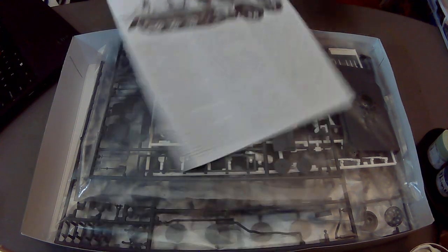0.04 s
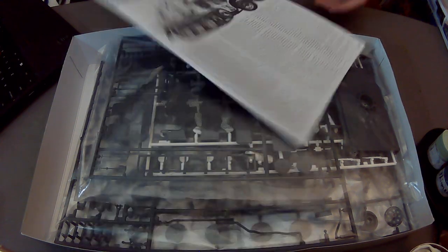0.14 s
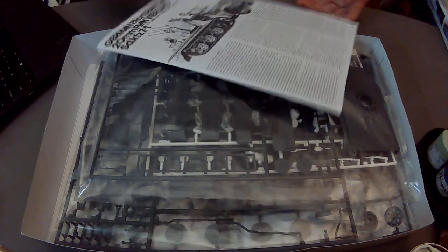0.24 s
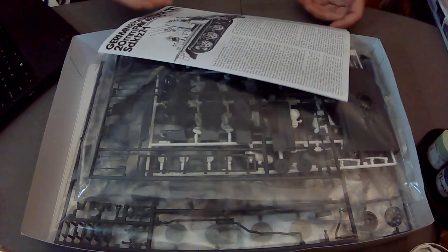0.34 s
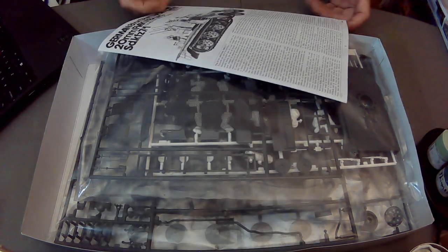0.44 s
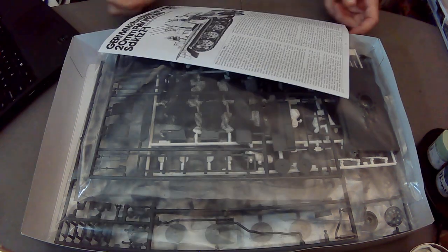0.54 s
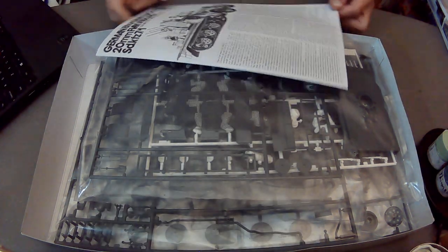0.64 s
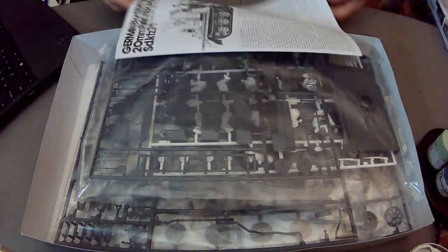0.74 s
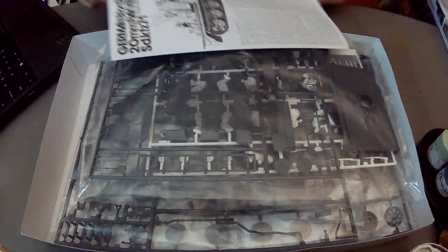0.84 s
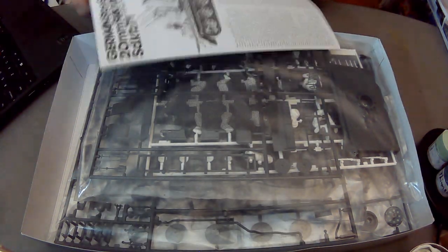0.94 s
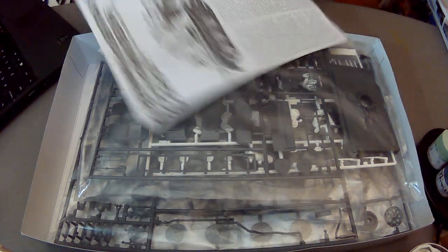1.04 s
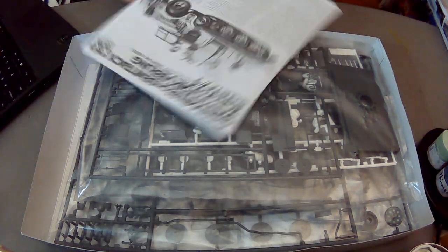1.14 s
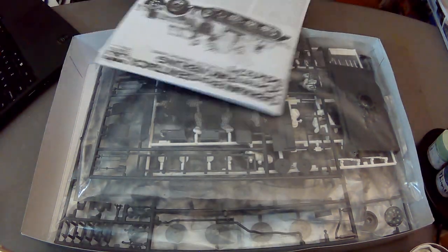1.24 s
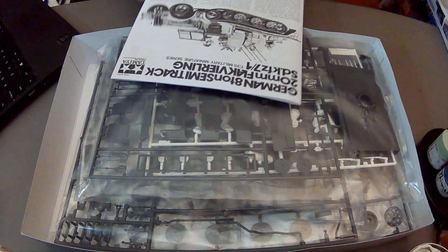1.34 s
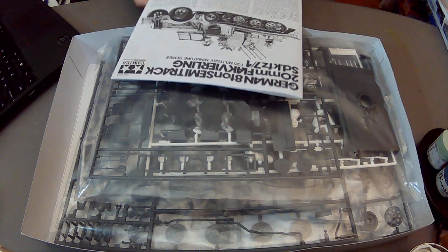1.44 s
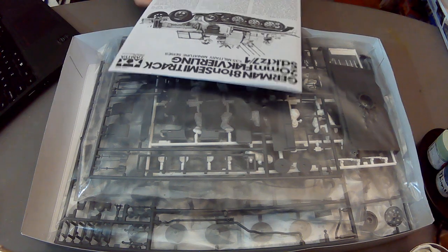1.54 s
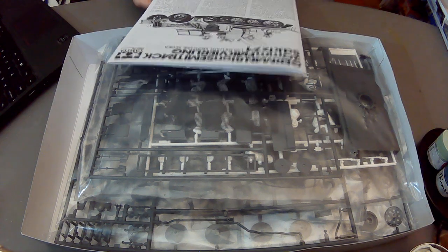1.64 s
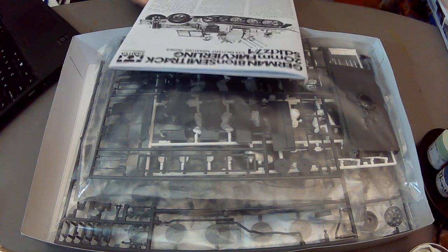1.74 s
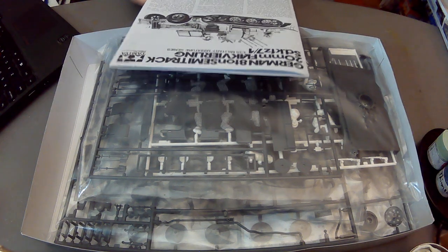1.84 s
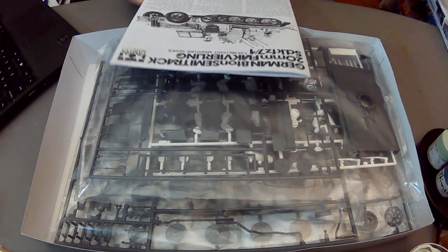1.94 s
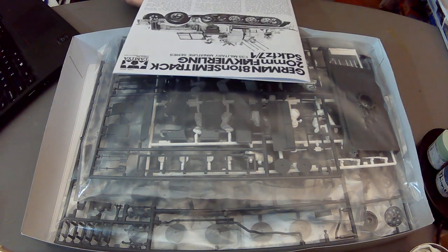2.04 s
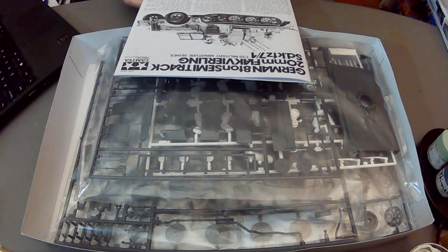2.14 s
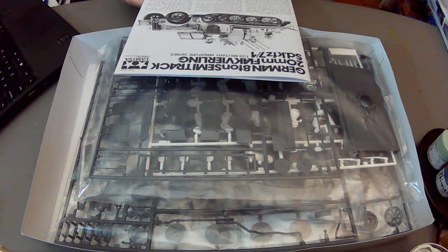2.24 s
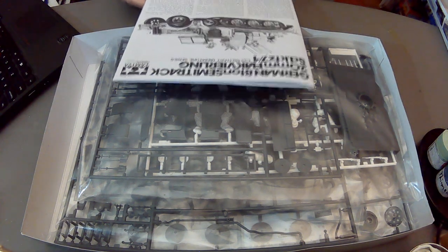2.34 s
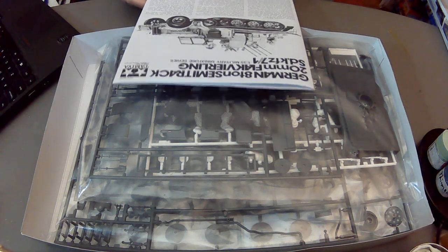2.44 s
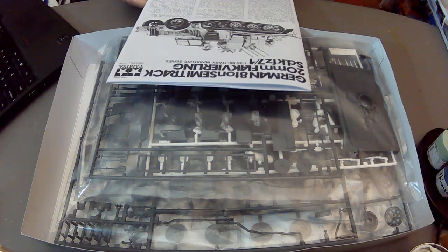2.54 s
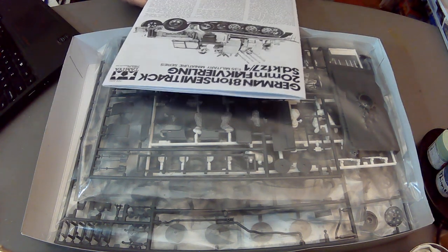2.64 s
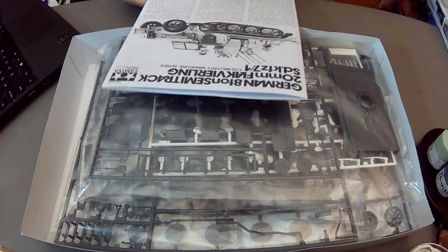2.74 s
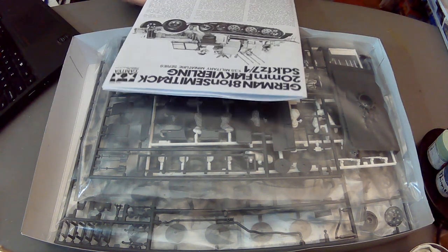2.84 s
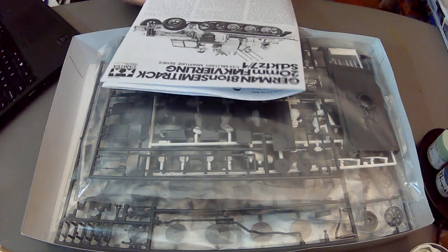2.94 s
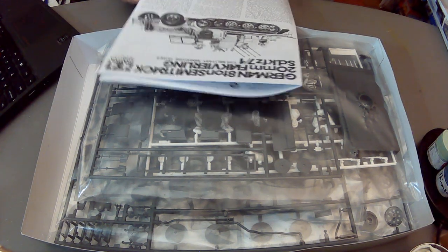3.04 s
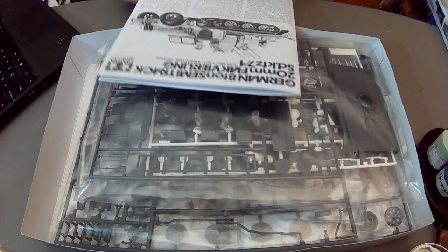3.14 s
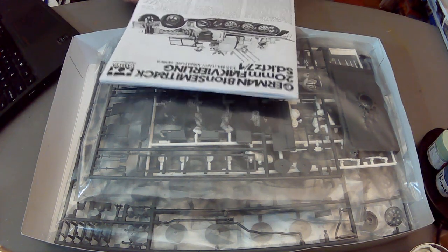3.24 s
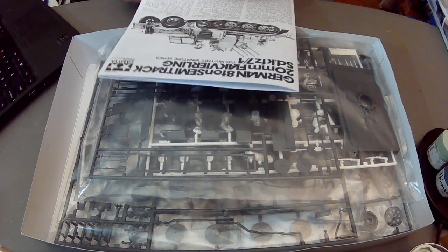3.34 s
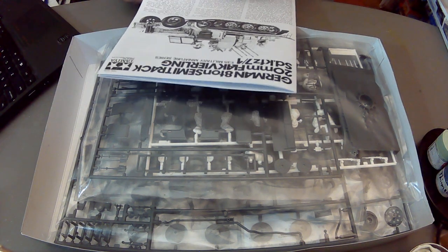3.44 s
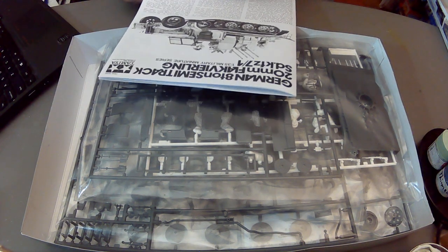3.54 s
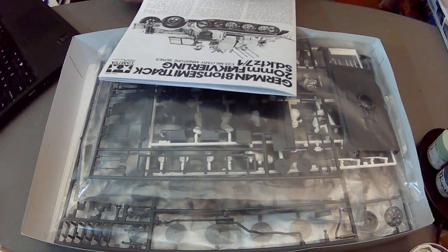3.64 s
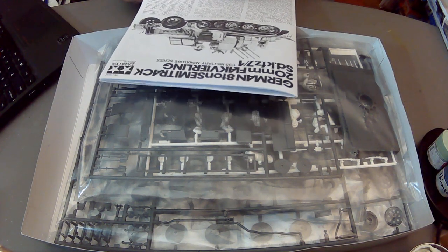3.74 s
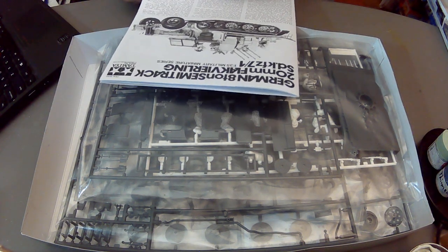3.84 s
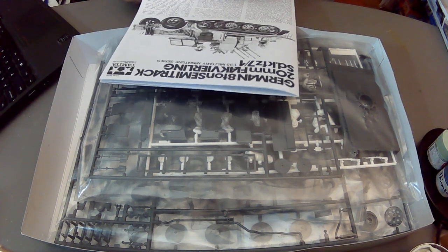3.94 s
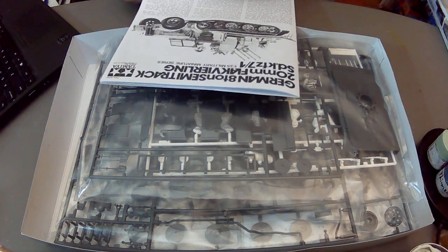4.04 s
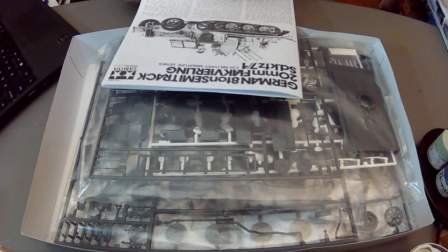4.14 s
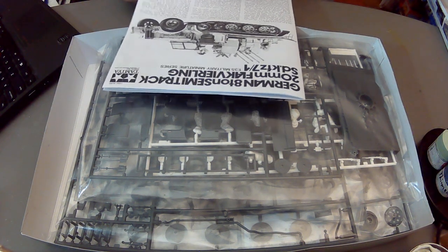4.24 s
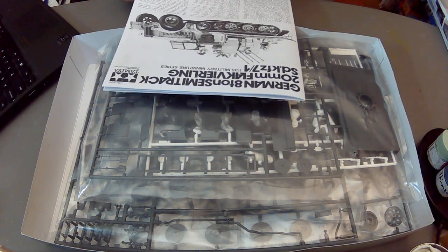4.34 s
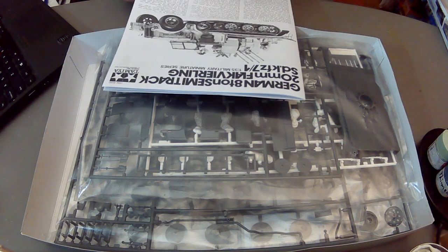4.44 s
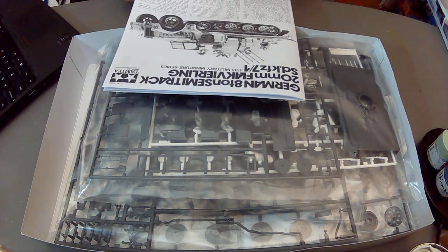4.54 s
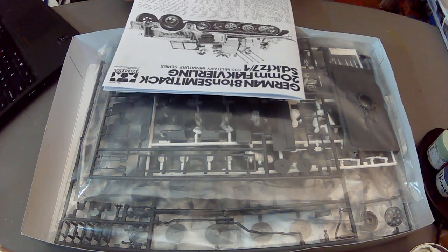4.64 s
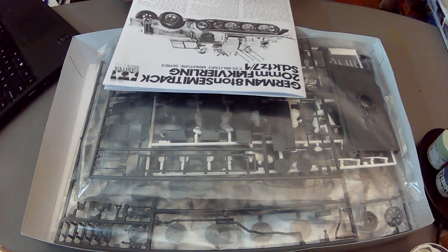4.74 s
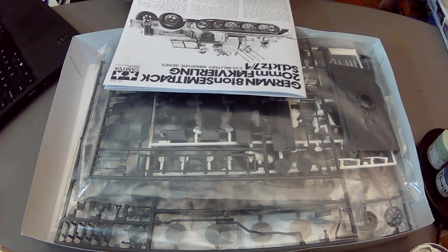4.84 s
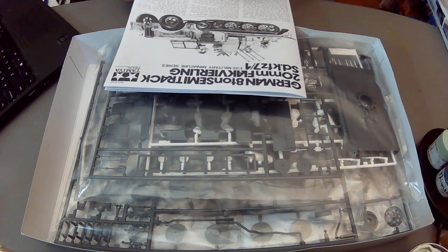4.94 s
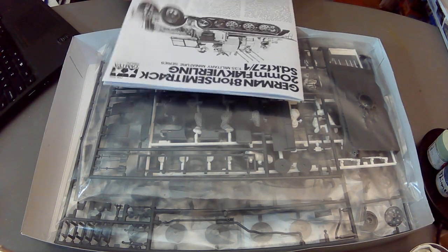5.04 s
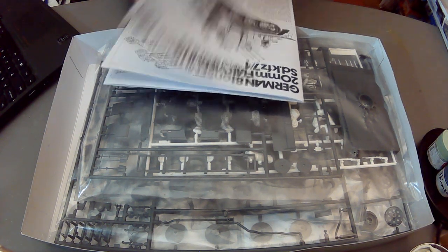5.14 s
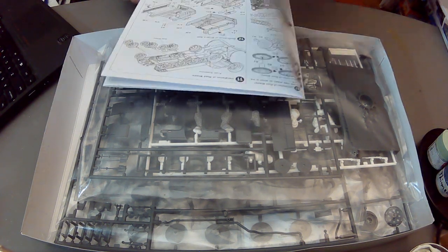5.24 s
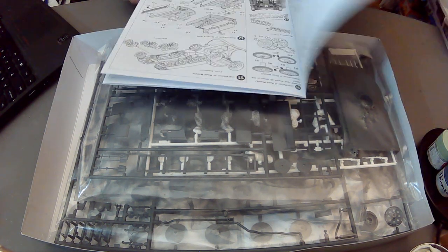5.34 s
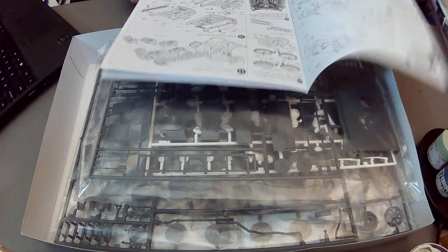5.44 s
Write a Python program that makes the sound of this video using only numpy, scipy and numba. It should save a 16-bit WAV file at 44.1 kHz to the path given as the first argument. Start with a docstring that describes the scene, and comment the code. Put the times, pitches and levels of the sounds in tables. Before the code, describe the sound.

A folded paper booklet is handled close to a small, bass-light microphone in a quiet room with faint steady noise and short near-wall reflections. From 0 to 0.5 s it moves in quick strokes: airy skin-on-paper hiss, coarse rustle and a hollow flap, with soft creases. After a brief dip, the busiest crackling comes at 0.6-1.15 s, with springy pops and page flicks. It thins until a piercing, very short tick at about 1.65 s, the sharpest sound. Little happens until 2.3 s. From there to 3.6 s come lighter, brighter rubs in small clusters, with dry ticks and fluttering page edges, strongest around 2.8-3.5 s. From 3.7 to 4.7 s there is barely any rustle. A small flick sounds at 4.72 s and a tick at 5.03 s, then a hollow snap at 5.22 s, a fuller rustle at 5.3 s and a crisp hissing swish near 5.43 s as a page turns.

```python
"""A fine hiss of skin on paper comes first, over faint room noise: fingers turn, slide and flex a folded
paper booklet over an open cardboard box, under a small camera microphone. Strokes are dense stick-slip noise:
hiss, coarser rustle of the sheet, hollow ring of the air in the fold. Filtered bursts make snapping creases and
flicked pages, single resonances make springing panels, smooth pressure pulses make air puffs at the microphone."""
import sys
import numpy as np
from scipy import signal
from scipy.fft import rfft, irfft
from scipy.io import wavfile
from scipy.ndimage import uniform_filter1d
from numba import njit

SR = 44100
rng = np.random.default_rng(int(sys.argv[2]) if len(sys.argv) > 2 else 0)


def gain_from_db(level_db):
    """Convert decibel levels to linear amplitude factors (20 dB per decade)."""
    decades = np.asarray(level_db, float) / 20
    return 10 ** decades


def bounce(signal):
    """Save signal as a 16-bit WAV file at the path given by the first command-line argument."""
    frames = np.transpose(np.atleast_2d(signal))
    limited = np.clip(frames, -1, 1)
    pcm = np.round(limited * 32767).astype(np.int16)
    wavfile.write(sys.argv[1], SR, pcm)


N = 242770
LN_60_DB = np.log(1000)


def shape(x, points):
    """Causal minimum-phase filter through (frequency [Hz], gain [dB]) points, from the cepstrum of the log gain."""
    hz, db = np.transpose(points)
    grid_hz = np.maximum(np.arange(2049) * SR / 4096, 1)
    log_gain = np.interp(np.log(grid_hz), np.log(hz), db) * np.log(10) / 20
    cepstrum = irfft(log_gain)
    cepstrum[1:2048] *= 2
    cepstrum[2049:] = 0
    impulse = irfft(np.exp(rfft(cepstrum)))
    return signal.fftconvolve(x, impulse)[:len(x)]


def ring(x, hz, width_hz):
    """One fixed resonance, gain 1 at the centre."""
    b, a = signal.iirpeak(min(hz, .45 * SR), max(hz / width_hz, .5), SR)
    return signal.lfilter(b, a, x)


@njit
def sweep(x, hz, width_share):
    """State-variable band-pass whose centre moves every sample; width_share is width over centre."""
    y, band, low = np.empty(len(x)), 0., 0.
    for i in range(len(x)):
        g = np.tan(np.pi * hz[i] / SR)
        v = (band + g * (x[i] - low)) / (1 + g * (g + width_share))
        band, low, y[i] = 2 * v - band, low + 2 * g * v, width_share * v
    return y


@njit
def grains(start, hz, size, t60_s):
    """Short decaying sines, one per grain."""
    out = np.zeros(N)
    for k in range(len(start)):
        turn = np.exp(2j * np.pi * hz[k] / SR - LN_60_DB / (t60_s * SR))
        z = size[k] + 0j
        for i in range(start[k], min(N, start[k] + int(t60_s * SR))):
            out[i] += z.imag
            z *= turn
    return out


def walk(rate_hz):
    """Random levels, each held 1 / rate_hz and slewed into the next; spread a little under 1."""
    hold = int(SR / rate_hz)
    levels = rng.standard_normal(N // hold + 1)
    return uniform_filter1d(np.repeat(levels, hold), hold)[:N]


def along(s, v):
    """Straight lines through values v at times s."""
    return np.interp(np.arange(N) / SR, s, v)


def swell(s, rise_ms, fall_ms, db):
    """Level in dB of events that rise and fall on straight dB slopes (ms per 20 dB) and add in power."""
    ms = np.arange(0, 1000 * N / SR + 1)
    late_ms = ms - 1000 * s[:, None]
    rising = -late_ms / np.maximum(rise_ms, 2)[:, None]
    falling = late_ms / np.maximum(fall_ms, 2)[:, None]
    drop_db = 20 * np.maximum(rising, falling)
    power = np.sum(gain_from_db(db[:, None] - drop_db) ** 2, axis=0) + 1e-14
    return np.interp(np.arange(N) * 1000 / SR, ms, 10 * np.log10(power))


# microphone response: (frequency [Hz], gain [dB])
MICROPHONE_RESPONSE = [(30, -53), (150, -57.5), (220, -30.5), (320, -3.5), (500, -2.5), (8000, 7),
                       (9600, 11.5), (11000, 18.5), (12500, 6), (14000, -3), (15700, -9.5), (16100, -29),
                       (20000, -46)]


def microphone(x):
    """The microphone drops the bass and peaks in the treble."""
    return shape(x, MICROPHONE_RESPONSE)


def heard_at_unit(x):
    """Scale so that the microphone delivers rms 1."""
    return x / np.std(microphone(x))


def heard_peak_unit(x):
    """Scale so that the microphone delivers peak 1."""
    return x / np.abs(microphone(x)).max()


def friction(scatter_db, catch_db, catch_rate_hz):
    """Dense slips of uneven size; the contact catches and lets go many times a second."""
    size_db = scatter_db * rng.exponential(size=N) + catch_db * walk(catch_rate_hz)
    return gain_from_db(size_db) * rng.standard_normal(N)


def patchy(x):
    """The bending sheet radiates unevenly: random patches in time and pitch swell or fade."""
    depth_db, patch_s, patch_hz = 3, .025, 600
    spec = signal.stft(x, nperseg=256)[2]
    field = rng.standard_normal(spec.shape)
    for _ in range(2):
        field = uniform_filter1d(field, max(int(patch_hz * 256 / SR), 1), axis=0)
        field = uniform_filter1d(field, max(int(patch_s * SR / 128), 1), axis=1)
    gain = gain_from_db(depth_db * field / np.std(field))
    return signal.istft(spec * gain, nperseg=256)[1][:N]


def resonate(modes, centre_hz, reach, wander, flap):
    """Rubbing rings resonances; those nearest the pitch of the flapping gap sound most, and each wavers."""
    rub = friction(scatter_db=2.0, catch_db=2.0, catch_rate_hz=70)
    gap_hz = centre_hz * np.exp(flap * walk(40))
    out, power = 0, 0
    for hz, width_hz, db in modes:
        near = gain_from_db(db) * (0.4 + np.exp(-(np.log(gap_hz / hz) / reach) ** 2))
        moving_hz = hz * np.exp(wander * walk(12))
        drifting = sweep(ring(rub, hz, 4 * width_hz), moving_hz, width_hz / hz)
        out = out + near * gain_from_db(2.37 * walk(35)) * heard_at_unit(drifting)
        power = power + near ** 2
    return out / np.sqrt(power)


# room and microphone noise spectrum: (frequency [Hz], gain [dB])
ROOM_SPECTRUM = [(18, -69), (30, -32), (95, -32.5), (189, -24.5), (273, -6), (364, 2), (473, 0),
                 (1040, -1.5), (1160, -5.5), (2480, -12.5), (3870, -17.5), (4650, -22.5), (5310, -20.5),
                 (9710, -18), (15700, -24.5), (16100, -49.5)]


def room():
    """Quiet air and the microphone's own noise, swelling a little."""
    level_db = -72 + 1.6 * walk(2.42)
    air = shape(rng.standard_normal(N), ROOM_SPECTRUM)
    return gain_from_db(level_db) * air / np.std(air)


# finger strokes: (loudest moment [s], rise [ms per 20 dB], fall [ms per 20 dB],
# skin hiss [dB], sheet rustle [dB], hollow ring [dB]); slopes are those of the hiss
STROKES = [(.010, 41, 31, -49.5, -74, -77), (0.041, 35, 93, -50.5, -74.5, -61.5),
           (.107, 8, 99, -50, -63, -84), (0.139, 0, 144, -36, -41, -44), (.18, 48, 107, -46.5, -62, -47.5),
           (.228, 62, 53, -44.5, -58, -52), (0.278, 0, 110, -41.5, -48, -45),
           (0.348, 118, 205, -71, -48.5, -53.5), (0.438, 106, 47, -78, -52, -48.5),
           (0.613, -1, 58, -44, -52.5, -104), (0.634, 27, 108, -51.5, -53, -57.5),
           (0.702, 44, 58, -46.5, -50, -52), (0.719, 5, 202, -36.5, -44, -46.5),
           (.765, 56, 102, -59, -44.5, -65), (0.797, 40, 104, -38, -41.5, -52),
           (.824, 70, 91, -42, -41.5, -45.5), (0.864, 62, 62, -60, -46.5, -49.5),
           (.9, 60, 99, -66, -61, -60), (0.942, 76, 93, -52, -57, -53), (0.991, 80, 29, -70, -64, -56),
           (1.035, 21, 182, -45, -56.5, -46.5), (1.084, 99, 57, -45.5, -51, -47.5),
           (1.124, 60, 50, -43.5, -55.5, -66), (1.15, 94, 200, -48, -79, -84),
           (1.24, 119, 116, -47, -67, -85), (1.29, 67, 52, -60, -60.5, -64),
           (1.37, 103, 152, -74, -70, -65.5), (1.531, 4, 100, -79, -65, -59.5),
           (1.554, 58.5, 250, -63, -55.5, -58), (1.605, 60, 60, -59, -61, -60),
           (1.636, 50, 38, -68, -57, -56), (1.652, 5, 54, -37, -68, -61.5), (1.715, 150, 42, -49, -77, -70),
           (1.789, 42, 144, -59.5, -70, -60), (1.906, 30, 80, -61, -96, -63),
           (1.974, 19, 46, -52.5, -76, -63), (2.328, 15, 75, -59, -51, -62.5),
           (2.345, 30, 60, -46, -49, -66), (2.362, 38, 60, -43, -48, -62.5), (2.382, 50, 50, -48, -50, -64),
           (2.428, 109, 39, -78, -63.5, -55), (2.487, 7, 60, -43.5, -51.5, -75),
           (2.507, 26, 64, -52, -51, -75), (2.538, 87, 53, -65, -51, -61),
           (2.663, 75, 105, -53.5, -53, -80), (2.77, 60, 63, -80, -62, -65),
           (2.796, 10, 101, -45, -52, -75), (2.834, 47, 44, -45.5, -50.5, -73),
           (2.867, 24, 57, -49.5, -52, -76), (2.911, 10, 103, -45, -51, -60),
           (2.961, 87, 99, -41.5, -47, -79), (3.006, 56, 47, -59, -52, -72),
           (3.07, 43, 127, -42.5, -51, -57.5), (3.105, 116, 89, -47, -47, -72),
           (3.191, 88, 78, -50, -51, -65), (3.348, 54, 42, -45.5, -53.5, -63),
           (3.425, 29, 60, -46, -53, -72), (3.461, 10, 65, -52, -59, -60), (3.592, 10, 69, -56, -58, -57.5),
           (3.627, 40, 41, -68, -59, -66), (3.73, 62, 60, -90, -78, -68), (3.789, 66, 88, -76, -65, -63.5),
           (3.841, 97, 61, -81, -70, -68.5), (4.046, 33, 77, -67.5, -65.5, -69),
           (4.09, 62, 80, -87, -66.5, -64), (4.178, 149, 249, -77, -60, -60.5),
           (4.328, 106, 107, -72, -70, -87), (4.439, 210, 78, -83, -68.5, -70),
           (4.723, 22, 44, -58, -55.5, -63), (4.736, 57, 70, -80, -60.5, -57),
           (4.819, 14, 47, -59.5, -65.5, -73), (4.882, 71, 60, -76, -70, -71),
           (5.032, 11, 123, -53, -60, -60), (5.074, 61, 86, -59.5, -53, -75), (5.1, 42, 40, -73, -61, -69),
           (5.19, 62, 58, -68, -60.5, -79), (5.21, 6, 26, -79, -53.5, -69), (5.225, 13, 72, -88, -75, -54),
           (5.27, 57, 65, -79, -63, -51), (5.301, 27, 45, -47, -40, -51), (5.35, 48, 102, -59, -62, -66),
           (5.392, 36, 63, -73, -54.5, -58), (5.412, 34, 58, -46, -53, -61),
           (5.429, 36, 66, -41.5, -50, -60), (5.48, 58, 152, -56.5, -62.5, -77)]


def strokes():
    """Levels in dB of hiss, rustle and hollow ring; the latter two rise and fall faster than the hiss."""
    s, rise_ms, fall_ms, skin_db, sheet_db, air_db = np.transpose(STROKES)
    hiss_db = swell(s, rise_ms, fall_ms, skin_db)
    rustle_db = swell(s, 0.72 * rise_ms, 0.72 * fall_ms, sheet_db)
    hollow_db = swell(s, 0.68 * rise_ms, 0.68 * fall_ms, air_db)
    return hiss_db, rustle_db, hollow_db


# booklet held between strokes: (time [s], faint rustle [dB], rustle centre [Hz], ring centre [Hz])
GRIP = [(0, -80, 2250, 827), (0.133, -70, 3360, 865), (.25, -59, 2430, 870), (.33, -66, 2995, 850),
        (.38, -72, 2560, 850), (.45, -80, 2050, 816), (.59, -101, 2340, 874), (0.726, -90, 3390, 850),
        (.76, -90, 2430, 850), (.83, -87, 3074, 820), (0.899, -83, 2620, 850), (1.08, -82, 2195, 856),
        (1.27, -83, 3120, 750), (1.47, -83, 2340, 770), (1.711, -66.5, 3280, 940),
        (1.799, -70.5, 2050, 750), (2.27, -71, 2096, 860), (2.6, -65.5, 2410, 940),
        (2.85, -64.5, 2647, 930), (2.96, -61, 3590, 936), (3.09, -65, 2594, 910), (3.302, -64.5, 2570, 840),
        (3.55, -71, 2460, 860), (3.72, -77, 2400, 850), (3.82, -77, 2630, 986), (3.95, -83, 2060, 857),
        (4.17, -81, 1905, 940), (4.36, -80, 2660, 815), (4.6, -80, 2155, 808), (5.079, -76.5, 2920, 874),
        (5.22, -63, 1670, 980), (5.303, -55, 2547, 1140), (5.5, -79.5, 3260, 880)]


def grip():
    """The held booklet rustles faintly, and its shape sets the pitch of rustle and ring."""
    s, held_db, rustle_hz, hollow_hz = np.transpose(GRIP)
    return gain_from_db(along(s, held_db)), along(s, rustle_hz), along(s, hollow_hz)


# duller hiss grows with the rustle: (rustle re hiss [dB], duller hiss re hiss [dB])
DULL_SHARE = [(-35.5, -14), (-13.5, -10.5), (-5.5, -6.5), (4.5, -2.5)]
# hiss spectrum: (frequency [Hz], gain [dB])
HISS_SPECTRUM = [(6000, -37.5), (8500, -6), (10000, -3.5), (12000, -2.5), (16000, -4)]
# duller hiss spectrum: (frequency [Hz], gain [dB])
DULL_SPECTRUM = [(3200, -16), (5000, -13), (6500, -7), (8500, -5.5), (11000, -19.5)]


def hiss(rustle_re_hiss_db):
    """Skin slides on paper fibres; a flatter touch adds a duller part."""
    dull_db = np.interp(rustle_re_hiss_db, *np.transpose(DULL_SHARE))
    rub = friction(scatter_db=2.0, catch_db=3.0, catch_rate_hz=90)
    fine = heard_at_unit(shape(rub, HISS_SPECTRUM))
    dull = heard_at_unit(patchy(shape(rub, DULL_SPECTRUM)))
    return fine + gain_from_db(dull_db) * dull


# rustle spectrum: (frequency [Hz], gain [dB])
RUSTLE_SPECTRUM = [(700, -7.5), (1500, -6), (2000, -8), (2600, -6), (3500, -8.5), (4300, -12), (5500, -21),
                   (9000, -16.5)]
# page resonances, also rung by flicks(): (frequency [Hz], width [Hz], level [dB])
PAGE_MODES = [(778, 100, 2), (1024, 46, -2), (1612, 110, -2.5), (2394, 120, -0.5), (2747, 130, -1.5),
              (3200, 390, -8), (4170, 600, -6), (5640, 1200, -12)]


def rustle(centre_hz):
    """The sheet rubs and rings its resonances; small panels between its bends pop, each at its own pitch."""
    centre_hz = np.clip(centre_hz, 800, 7000)
    rub = friction(scatter_db=2.0, catch_db=2.0, catch_rate_hz=80)
    start = np.sort(rng.integers(0, N, 4000))
    pitch, size = rng.standard_normal((len(start), 2)).T
    sizes = gain_from_db(4 * size - 5 * np.maximum(pitch, 0))  # higher pops are weaker
    pops = grains(start, centre_hz[start] * np.exp(0.33 * pitch), sizes, 0.035)
    broad = patchy(shape(rub, RUSTLE_SPECTRUM))
    page = resonate(PAGE_MODES[2:], centre_hz, .45, wander=.03, flap=0.22)
    mix = heard_at_unit(broad)
    mix = mix + gain_from_db(-6) * heard_at_unit(sweep(broad, centre_hz, 1.0))
    mix = mix + gain_from_db(-3.0) * heard_at_unit(pops)
    return heard_at_unit(mix + gain_from_db(-4.0) * page)


# air between the pages, then the deeper fold: (frequency [Hz], width [Hz], level [dB])
HOLLOW_MODES = [(647.7, 19, -1.5), (747.3, 59.5, 3.5), (820, 47, 2), (892, 91, 2), (1027, 220, -6.5),
                (1315, 28, 3.5), (940, 330, -5)]


def hollow(centre_hz):
    """Rubbing rings the air trapped between the pages."""
    return resonate(HOLLOW_MODES, centre_hz, 0.16, wander=.03, flap=0.14)


# fold resonances: (frequency [Hz], width [Hz], level [dB])
FOLD_MODES = [(338, 280, 1), (397.4, 26.5, 1), (457.7, 32, -2.5), (515, 35, -5)]
# hard bends of the fold: (loudest moment [s], rise [ms per 20 dB], fall [ms per 20 dB], level [dB], centre [Hz])
FLEXES = [(.051, 34, 77, -62, 500), (.158, 34, 131, -55, 448), (.248, 26, 42, -50, 397),
          (0.262, 20, 37, -43, 370), (.288, 50, 6, -45, 406), (.44, 150, 40, -69, 476),
          (0.729, 24, 150, -59, 398), (.84, 64, 77, -62, 400), (.89, 82, 33, -57.5, 405),
          (1.055, 36, 122, -61.5, 433), (1.11, 78, 38, -70, 440), (1.292, 17, 40, -64.5, 426),
          (2.058, 15, 14, -60, 445), (5.211, 5, 37, -54.5, 475), (5.29, 71, 27, -52, 515)]


def fold(ring_gain):
    """The fold rings 15.5 dB under the hollow ring, and louder where it is bent hard."""
    *flex, fold_hz = np.transpose(FLEXES)
    gain = np.hypot(gain_from_db(-15.5) * ring_gain, gain_from_db(swell(*flex)))
    return gain * resonate(FOLD_MODES, along(flex[0], fold_hz), 0.12, wander=0.0069, flap=.02)


# snapping creases: (time [s], peak [dB], centre [Hz], burst t60 [s], 3 ms at least)
SNAPS = [(.0225, -46, 1080, 0.01), (.03, -43.5, 750, 0.016), (.043, -47, 940, 0.033),
         (.108, -56, 2200, .008), (.13, -55, 900, .008), (0.104, -40, 10300, 0.02),
         (0.138, -34, 3400, 0.01), (0.1415, -40, 3200, .016), (.278, -44.5, 360, 0.039),
         (.256, -46, 290, .04), (.258, -48, 4500, 0.0087), (0.278, -33, 10500, .02),
         (.573, -58, 9000, .004), (.59, -56, 9000, 0.0037), (0.612, -45, 11700, .025),
         (.717, -32, 11200, 0.028), (0.725, -40, 1200, 0.0092), (.737, -32, 2100, .012),
         (0.737, -36, 4300, 0.017), (0.755, -32, 2400, 0.035), (0.806, -33, 2190, .015),
         (0.95, -36.5, 10400, 0.015), (1.033, -47, 820, 0.012), (1.034, -37, 10800, .025),
         (1.283, -36, 10900, 0.041), (1.526, -51, 765, 0.036), (1.632, -30.5, 10900, 0.011),
         (1.65, -18, 11200, 0.0052), (1.6537, -16.5, 11100, 0.0027), (1.655, -22, 10900, 0.0063),
         (1.638, -47, 2780, .01), (1.712, -51, 4150, 0.008), (1.974, -50, 10000, 0.036),
         (2.034, -52, 11200, 0.018), (2.052, -51.5, 580, 0.011), (2.052, -54, 1640, 0.0074),
         (2.333, -40.5, 11400, 0.028), (2.409, -48, 820, .05), (2.485, -43, 11100, .025),
         (2.795, -37.5, 11200, 0.029), (2.827, -31, 10800, 0.038), (2.828, -45, 2530, 0.021),
         (2.868, -32.5, 10600, 0.037), (2.908, -39, 11500, .025), (2.97, -38.5, 2900, 0.074),
         (3.074, -54, 2300, .015), (3.19, -60, 960, 0.025), (3.341, -35.5, 11400, 0.042),
         (3.4, -47, 11000, .01), (3.415, -31.5, 10500, 0.07), (3.421, -44, 3200, 0.0063),
         (3.459, -39, 10800, 0.026), (3.459, -45, 2640, 0.038), (3.539, -49.5, 10400, 0.054),
         (3.59, -52.5, 2330, 0.014), (4.723, -62, 797, 0.024), (4.82, -43.5, 10900, 0.03),
         (5.032, -40.5, 10700, 0.042), (5.068, -45, 3000, .01), (5.204, -51, 4000, .006),
         (5.21, -43, 1590, .012), (5.212, -44, 2400, .01), (5.221, -31, 1400, 0.009),
         (5.221, -38.5, 2670, 0.0069), (5.259, -50, 5900, .005), (5.302, -45, 3040, .015),
         (5.426, -36, 4570, .006)]


def snaps():
    """A crease buckles: a tick and a short burst, ringing around its own centre."""
    out, t = np.zeros(N + 4096), np.arange(4096) / SR
    noises = rng.standard_normal((len(SNAPS), len(t)))
    for (s, db, hz, t60_s), noise in zip(SNAPS, noises):
        # width over centre: snaps under 6 kHz, ticks above, hardest ticks
        share = 0.55 if hz < 6000 else 1 if db < -28 else 0.47
        burst = noise * np.exp(-LN_60_DB * t / max(t60_s, .003)) + 4 * (t == 0)
        for widen in (1, 1, 1.3):
            burst = ring(burst, hz, widen * share * hz)
        start = int(s * SR)
        out[start:start + len(t)] += gain_from_db(db) * heard_peak_unit(burst)
    return out[:N]


# air puffs: (zero crossing [s], slope level [dB], length [s])
PUFFS = [(.14, -86, .004), (.165, -84, 0.0057), (.275, -89, 0.0073), (0.724, -80, 0.0053),
         (1.644, -81, 0.00417), (5.222, -68, 0.0025)]


def puffs():
    """Each puff of air on the microphone is one soft push and pull of pressure."""
    t = np.arange(N) / SR
    out = np.zeros(N)
    for s, db, length_s in PUFFS:
        out += gain_from_db(db) * (s - t) / length_s * np.exp(-((t - s) / length_s) ** 2)
    return out


# panels springing free: (time [s], peak [dB], pitch [Hz], t60 [s], 10 ms at least)
PINGS = [(.254, -43, 382, 0.097), (.275, -46, 394, .07), (.316, -36.5, 755, 0.086), (.141, -42, 3100, .04),
         (.143, -44, 4300, .03), (.145, -43, 900, .07), (.73, -43, 4400, .03), (.74, -39, 2350, .06),
         (.752, -38, 2750, .06), (.762, -43, 4300, .05), (.766, -42, 2450, .04), (.803, -39, 2200, .03),
         (.835, -43, 2800, .05), (.86, -44, 2900, .04), (.804, -41, 846, .05), (.824, -39, 874, 0.045),
         (1.026, -46, 910, .08), (1.034, -48, 2600, 0.037), (1.036, -48, 1314, .06), (1.052, -44, 743, .06),
         (1.08, -46, 935, 0.088), (1.08, -52, 2500, .06), (1.1, -52.5, 1322, 0.22),
         (1.104, -53, 2090, 0.083), (1.104, -53, 2550, .07), (1.107, -48, 770, .06), (1.6, -50, 840, .06),
         (1.712, -45.5, 3650, 0.018), (1.719, -57, 3980, .04), (2.404, -52, 950, .05),
         (2.414, -50, 760, .09), (2.826, -45.5, 2440, .04), (2.944, -44, 3370, .03),
         (2.967, -51, 3280, .03), (3.003, -49, 2780, .04), (3.06, -48, 2770, .04), (3.192, -47, 960, 0.046),
         (3.418, -50, 4300, .04), (3.459, -54, 2760, .07), (3.466, -53, 952, 0.089),
         (3.591, -55, 1600, 0.069), (3.593, -51, 2610, 0.049), (3.622, -52, 1580, 0.052),
         (3.785, -61, 2640, 0.053), (4.162, -60, 1770, 0.07), (4.724, -48, 1580, .05),
         (4.724, -54, 2410, .06), (4.735, -47, 753, 0.057), (5.031, -58, 3200, .04),
         (5.031, -59, 4250, .05), (5.031, -60, 5500, .05), (5.211, -50, 497, 0.088),
         (5.223, -38, 972, 0.055), (5.232, -44, 800, .08), (5.25, -51, 500, .06), (5.27, -50, 1450, .05),
         (5.288, -48, 560, .06), (5.3, -50, 1840, .07), (5.316, -48, 2500, 0.11)]


def pings():
    """A single panel of the sheet takes a short rough push and rings out at one pitch."""
    out, t = np.zeros(N + 4096), np.arange(4096) / SR
    noises = rng.standard_normal((len(PINGS), len(t)))
    for (s, db, hz, t60_s), noise in zip(PINGS, noises):
        push = (t == 0) + 0.18 * noise * np.exp(-t / .004)
        tone = ring(push, hz, LN_60_DB / (np.pi * max(t60_s, .01)))
        start = int(s * SR)
        out[start:start + len(t)] += gain_from_db(db) * heard_peak_unit(tone)
    return out[:N]


# page flicks: (time [s], peak [dB], burst t60 [s], 10 ms at least, brightness [dB per octave])
FLICKS = [(.145, -41, 0.061, -5), (.258, -53, .03, 4), (.279, -45, 0.045, -5), (.318, -48, 0.14, -6),
          (.365, -42.5, 0.22, -2.5), (.42, -50, 0.09, -5), (.698, -47, 0.045, -2), (.72, -42, 0.075, 5),
          (0.751, -35.5, 0.14, 6), (.782, -39, .1, 7), (.804, -45, .05, 1), (.826, -49, .06, 1),
          (.885, -43, 0.11, -5.5), (1.035, -42, 0.11, 9), (1.06, -48, 0.16, 2), (1.09, -48, .12, 0),
          (2.5, -48, 0.14, 8), (2.63, -52, .15, 4), (2.69, -51, 0.22, 1), (2.8, -49, 0.055, 9),
          (2.865, -43.5, 0.065, 12), (2.91, -55, 0.088, 14), (2.945, -44, 0.092, 11),
          (2.971, -42, 0.12, 13), (3.005, -47, 0.087, 8), (3.07, -43, 0.11, 4), (3.135, -47, 0.054, 2),
          (3.19, -52, 0.099, 6), (3.415, -47, 0.21, 3), (3.459, -45.5, 0.12, 2.5), (3.591, -50, 0.12, -2),
          (3.622, -52.5, 0.089, -2), (4.16, -58, 0.13, 0), (4.352, -57, 0.11, -1), (4.723, -45.5, .12, 0.5),
          (4.738, -49.5, .14, -3), (4.862, -63, 0.037, 3), (5.033, -58, 0.088, 9), (5.066, -51, 0.073, 9),
          (5.078, -51, 0.093, 6), (5.1, -54, 0.065, 1), (5.24, -54, 0.09, -3), (5.27, -48.5, .08, -1),
          (5.32, -48, .15, 3)]


def flicks():
    """A page springs against its neighbour: a rough burst rings its resonances, slightly detuned each time."""
    out, t = np.zeros(N + 8192), np.arange(8192) / SR
    noises = rng.standard_normal((len(FLICKS), len(t) + len(PAGE_MODES)))
    for (s, db, t60_s, bright_db), noise in zip(FLICKS, noises):
        envelope = (1 - np.exp(-t / 0.00043)) * np.exp(-LN_60_DB * t / max(t60_s, .01))
        burst = noise[:len(t)] * envelope
        body = 0
        for (hz, width_hz, mode_db), off in zip(PAGE_MODES, noise[len(t):]):
            one = ring(burst, hz * (1 + 0.013 * off), 3 * width_hz)
            one = ring(one, hz * (1 + 0.014 * off), width_hz)
            body = body + gain_from_db(mode_db + bright_db * np.log2(hz / 1600)) * one / np.std(one)
        start = int(s * SR)
        out[start:start + len(t)] += gain_from_db(db) * heard_peak_unit(body)
    return out[:N]


def walls(paper):
    """Near walls return a short decaying tail of dense reflections."""
    t60_s, level_db, delay_s = 0.093, -10.5, .003
    t = np.arange(SR // 4) / SR
    tail = rng.standard_normal(len(t)) * np.exp(-LN_60_DB * t / t60_s) * (t > delay_s)
    return gain_from_db(level_db) * signal.fftconvolve(paper, tail / np.linalg.norm(tail))[:N]


def scene():
    """The hand plays the friction layers and the short events; near walls answer."""
    hiss_db, rustle_db, hollow_db = strokes()
    held_gain, rustle_hz, hollow_hz = grip()
    rustle_gain = np.hypot(gain_from_db(rustle_db), held_gain)
    ring_gain = np.hypot(gain_from_db(hollow_db), gain_from_db(-2) * held_gain)
    paper = gain_from_db(hiss_db) * hiss(rustle_db - hiss_db)
    paper = paper + rustle_gain * rustle(rustle_hz)
    paper = paper + ring_gain * hollow(hollow_hz) + fold(ring_gain)
    paper = paper + snaps() + pings() + flicks()
    return (paper + walls(paper))[None]


def band_limit(x):
    """A steep low-pass at the top of the band."""
    return signal.sosfilt(signal.butter(12, 16630, fs=SR, output="sos"), x)


def record(dry):
    """The microphone colours the paper; room noise and air puffs join."""
    mix = microphone(dry[0]) + room() + puffs()
    return band_limit(mix[None])


dry = scene()
out = record(dry)
bounce(out)
```